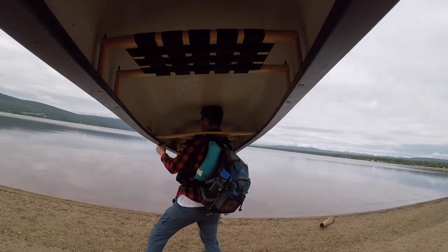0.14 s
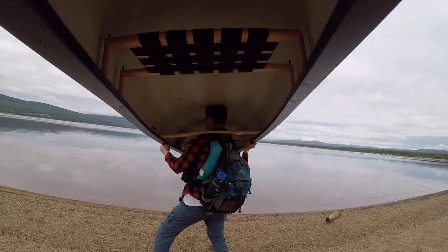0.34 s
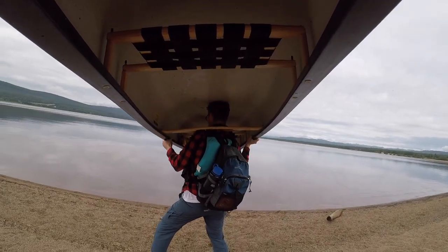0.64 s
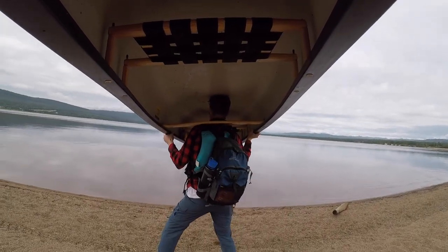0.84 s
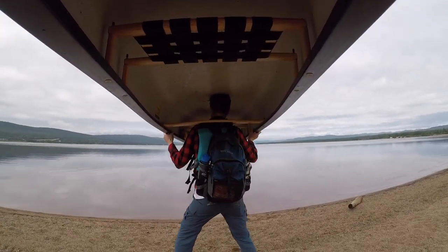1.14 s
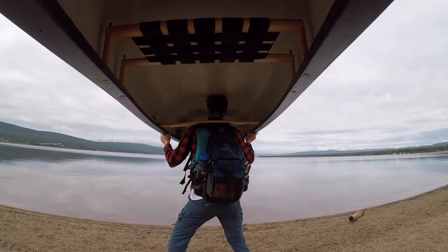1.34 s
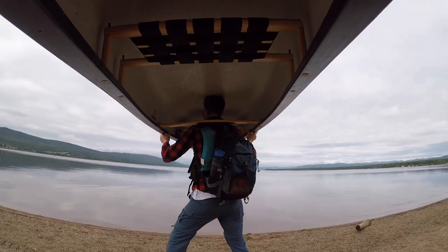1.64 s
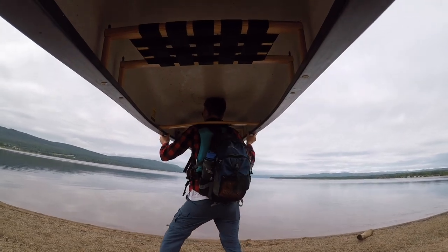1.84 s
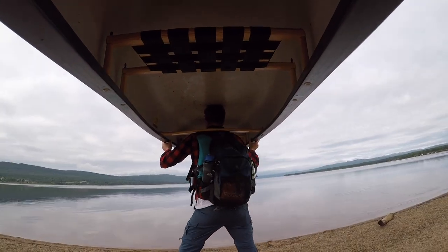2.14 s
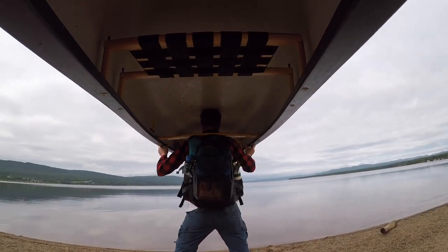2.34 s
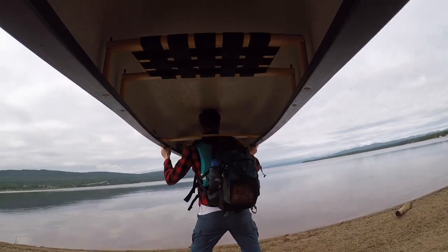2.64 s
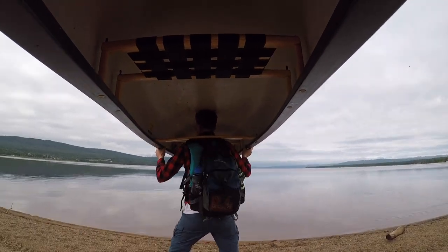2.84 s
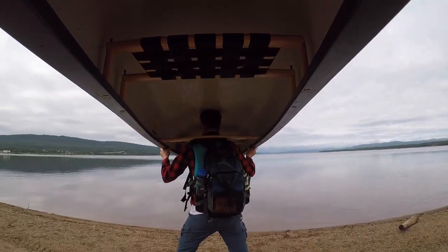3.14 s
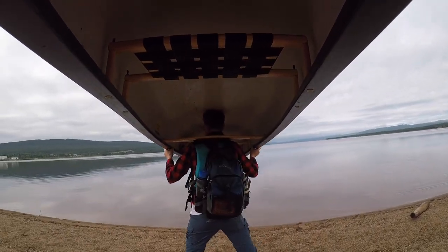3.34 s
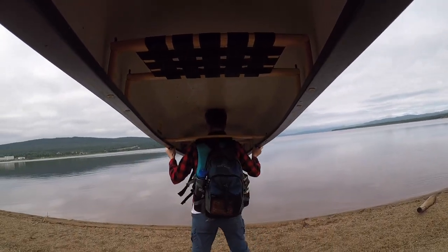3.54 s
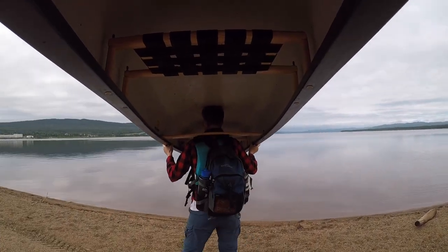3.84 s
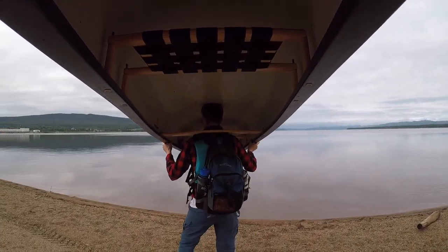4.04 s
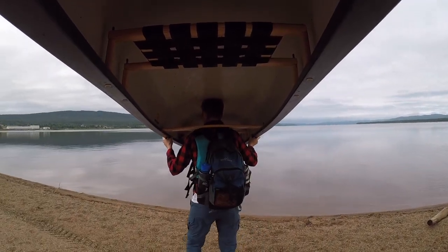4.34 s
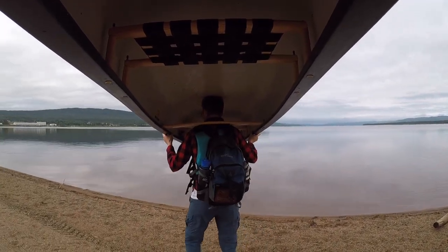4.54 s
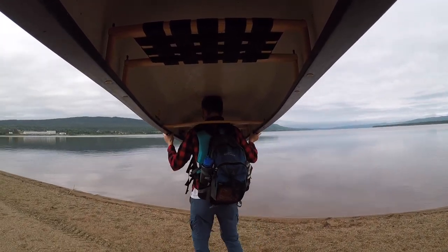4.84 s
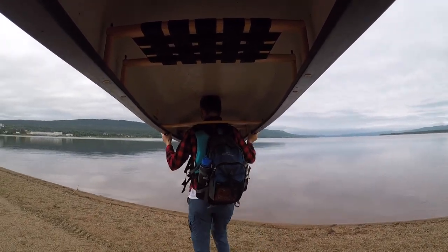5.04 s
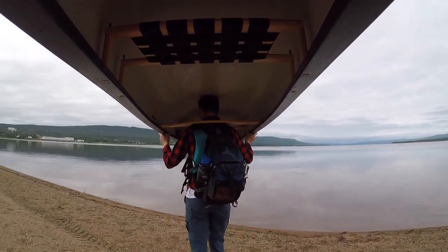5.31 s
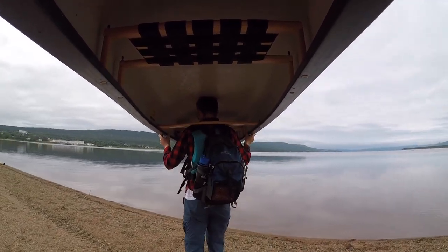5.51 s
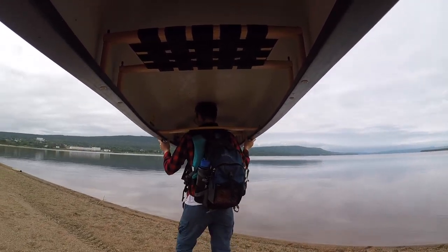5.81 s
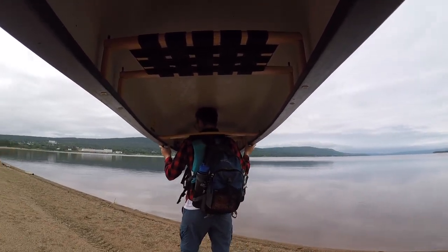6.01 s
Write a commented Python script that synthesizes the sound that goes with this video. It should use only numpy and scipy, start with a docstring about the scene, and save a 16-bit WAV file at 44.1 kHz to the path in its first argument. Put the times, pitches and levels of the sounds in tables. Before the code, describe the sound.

Close inside an overturned canoe carried along a sandy shore, a microphone fixed to the hull picks up loud, boomy bumps and grainy rubs as it settles on the shoulders. Deep flexing and rumble sway underneath. Small buckle-like clicks and faint pack rustle grow unevenly, then sand crunches and a loud nylon swish come past the middle. A hard knock follows, then lesser bumps to the end.

```python
"""Inside an upturned canoe settled on a walker's shoulders and carried along a sandy lake shore.
Close-set bumps and rubs come first: roughened decaying modes for bumps, stick-slip grains through them for rubs.
Low flexing tones and rumble sway beneath; short clicks, as of buckles, are bursts of filtered noise.
The pack's rustle, coloured random grains, builds unevenly from faint; a loud swish falls near 3.7 s.
Boots crunch sand grains from 3.6 s; a hard knock lands at 4.7 s and lesser ones follow to the end."""
import sys
import numpy as np
from scipy import signal
from scipy.fft import rfft, irfft
from scipy.io import wavfile
from scipy.ndimage import uniform_filter1d, minimum_filter1d

SR = 44100
rng = np.random.default_rng(int(sys.argv[2]) if len(sys.argv) > 2 else 0)


def unload_wav(signal):
    """Save mono or channel-first audio to the path in sys.argv[1] as 16-bit WAV at rate SR, clipped to [-1, 1]."""
    wavfile.write(
        sys.argv[1],
        SR,
        np.round(np.clip(np.atleast_2d(signal).T, -1, 1) * 32767).astype(np.int16),
    )


N = 272097

# Flex of the hull along its length. Each row: time in seconds, level in dB.
FLEX = [(0.0, -31.5), (0.05, -24), (0.26, -32), (0.34, -55), (0.5, -25), (1.37, -38), (1.42, -46),
        (1.6, -28.5), (2.29, -28), (2.7, -19), (3.35, -37.5), (3.61, -25.5), (4.07, -40.5), (4.4, -28),
        (4.48, -44), (4.62, -30), (6.0, -25), (6.17, -29.5)]
# Sideways lurches. Each row: start in seconds, length in seconds, rumble level in dB.
LURCHES = [(0, 0.16, -31), (2.732, 0.27, -25), (3.587, 0.6, -32.5), (5.75, .25, -30), (6.013, 0.11, -20)]
# Spectrum of the rocking rumble. Each row: frequency in Hz, relative level in dB.
ROCK_COLOUR = [(10, 36.5), (18, -3), (25, 34.5), (34, 48), (43, 26.5), (60, 35.5), (80, 37.5), (110, 3),
               (220, -39.5)]
# Steady rustle of the walker. Each row: time in seconds, nylon level in dB, sand and cloth level in dB.
PACE = [(0, -81.5, -69), (.6, -77.5, -68.5), (1.25, -71.5, -61), (2, -64, -56), (2.6, -69.5, -59),
        (3, -69.5, -60), (3.55, -59, -52.5), (4.45, -59, -51.5), (4.95, -65.5, -57.5), (5.4, -63, -55),
        (6.15, -59, -51.5)]
# Strokes of sleeve and trouser against the pack. Each row: peak in seconds, half length in seconds,
# nylon swish level in dB, scuff level in dB.
STROKES = [(0.038, 0.058, -69.5, -53), (.14, 0.038, -68.5, -61), (0.297, 0.071, -68.5, -55.5),
           (0.486, 0.061, -70.5, -61.5), (0.724, 0.1, -70.5, -62), (1.02, 0.17, -72, -58),
           (1.461, 0.075, -67.5, -53.5), (1.796, 0.031, -64, -49), (2.083, 0.064, -61, -49),
           (2.194, 0.085, -55.5, -48), (2.302, 0.035, -63, -47), (2.478, 0.18, -62, -49.5),
           (2.8, 0.083, -68.5, -53.5), (3.354, 0.042, -65.5, -57), (3.74, 0.083, -50, -48.5),
           (4.163, 0.12, -56, -49), (4.636, 0.09, -52.5, -44), (5.066, 0.052, -60.5, -75),
           (5.13, .015, -52.5, -55), (5.191, 0.047, -48, -58), (5.55, 0.064, -65, -55),
           (5.883, 0.15, -52, -55)]
# Spectrum of nylon swish. Each row: frequency in Hz, relative level in dB.
SWISH_COLOUR = [(1500, -24), (3000, -10), (3900, -5.5), (4700, -8), (5400, -6), (6400, 0), (7700, 0),
                (8400, -5.5), (10000, -9.5), (11300, -18), (13000, -28), (15000, -42)]
# Spectra of the dull and bright nylon parts. Each row: frequency in Hz, relative level in dB.
BRUSH_COLOUR = [(1500, -18), (2800, -3), (4000, 0), (4800, -5), (7000, -18)]
SIZZLE_COLOUR = [(8000, -14), (10000, 0), (12000, -3), (13500, -8), (15000, -28)]
# Spectrum of cloth and sand scuffing. Each row: frequency in Hz, relative level in dB.
SCUFF_COLOUR = [(300, 2.5), (700, 0), (1100, -2), (1550, -4.5), (1720, -8.5), (1900, -6), (2300, -10),
                (3800, -13), (4800, -22), (9000, -78.5), (14000, -81)]
# Boots digging into sand. Each row: start in seconds, level in dB, decay length in seconds.
STEPS = [(3.593, -30.5, 0.028), (3.612, -48, 0.049), (3.718, -55, .026), (4.116, -45.5, 0.05),
         (5.776, -39, 0.025), (5.8, -36, 0.047)]
# Spectrum of crunching sand. Each row: frequency in Hz, relative level in dB.
SAND_COLOUR = [(400, 0.5), (1000, -2.5), (1500, 1), (1850, -1), (2300, -6), (3000, -3.5), (3900, -9),
               (4500, -14.5), (7200, -4), (10000, -18.5), (11300, -32), (13300, -20), (15000, -29)]
# Short clicks: buckles, fittings, a sand crunch, the crack of a hard knock.
# Each row: time in seconds, level in dB, ring frequency in Hz.
CLICKS = [(.017, -65, 7600), (0.06, -53.5, 2800), (.062, -63, 7100), (.385, -68, 3500), (0.683, -59, 1380),
          (0.742, -55.5, 1790), (0.741, -57.5, 3760), (0.945, -58, 2480), (.948, -52.5, 4070),
          (1.244, -66, 7340), (1.498, -56.5, 1490), (1.627, -64.5, 3840), (1.674, -59.5, 3550),
          (2.0201, -47.5, 4440), (2.02, -54, 6640), (2.229, -56, 2100), (2.442, -49, 3310),
          (2.44, -45.5, 1570), (2.448, -50.5, 1980), (2.534, -54, 2560), (2.623, -55, 6440),
          (2.636, -56.5, 6450), (2.751, -61, 4200), (2.814, -59, 3170), (2.91, -55, 2470),
          (3.598, -39, 1880), (3.729, -46.5, 4200), (3.923, -58, 4230), (4.14, -45, 1880),
          (4.71, -36.5, 1610), (4.713, -45, 2470), (4.714, -51, 3820), (5.524, -54.5, 6500)]
# Likeness of left and right in airborne sound. Each row: frequency in Hz, correlation from -1 to 1.
LIKENESS = [(300, -.6), (700, -.5), (1400, -.2), (2300, .1), (3600, .55), (6500, .25), (9000, .05),
            (14000, 0)]
# Hull modes. Each row: frequency in Hz, 60 dB decay time in seconds, relative level in dB rocking
# the two ports against each other, relative level in dB moving them together.
HULL = [(57, 0.35, -6, -28), (81, 0.25, -2.5, -32), (97.1, 0.79, -17.5, -14), (120.07, 0.76, 0.5, -16.5),
        (126.7, 0.29, -3.5, -13), (150.4, 0.65, -19, -12.5), (165.3, 0.25, -14.5, -13),
        (196.4, 0.18, -20.5, -9), (236, 0.26, 1, -17), (258.9, 0.15, -5, -7.5), (305, 0.023, 17, -36),
        (319, 0.021, 2.5, -49), (374.6, 0.099, 3, -11.5), (428.6, 0.17, -4, -21), (448, 0.066, -12, -4),
        (493.6, 0.13, 3, -14), (558, 0.058, -26, -19.5), (615, 0.07, -0.5, -20.5), (674, 0.072, -0.5, -11),
        (791, 0.052, 10.5, -5), (920, 0.045, 11.5, -9.5), (1210, 0.044, -11, -10), (1550, 0.033, 0.5, -7.5),
        (1912, 0.025, -10, -9)]
# Longer slides of the yoke over the shoulders. Each row: start in seconds, length in seconds,
# panel chatter level in dB, shell drone level in dB.
SLIDES = [(0, 0.035, -43, -2), (0.272, 0.078, -40, -17), (0.715, 0.24, -37, -27.5),
          (2.063, 0.25, -28.5, -18.5), (2.405, .05, -28, -17), (2.75, 0.24, -62, -24),
          (3.738, 0.087, -38, -16.5), (4.42, 0.13, -35.5, -24), (4.562, 0.11, -55, -19.5),
          (5.442, 0.18, -42, -14.5), (6.032, 0.093, -40, -21.5)]
# Bumps on the hull. Each row: time in seconds, shell boom level in dB, panel knock level in dB,
# contact hardness in dB per octave, stiff rim clack level in dB.
KNOCKS = [(0.004, -10, -16, -9, -32), (0.025, -12.5, -14.5, -2, -50), (0.055, -17.5, -20.5, 1.5, -35.5),
          (0.249, -15, -14.5, -4.5, -30.5), (0.337, -44, -21.5, -10.5, -63), (0.37, -14, -25, -7, -50),
          (0.686, -22, -31.5, -2.5, -45.5), (0.789, -24.5, -39, 23, -81), (1.003, -24, -30.5, -4.5, -63),
          (1.114, -21.5, -29, -1.5, -46), (1.261, -15, -30.5, -16, -55), (1.384, -14.5, -23, -13.5, -54),
          (1.417, -37, -24.5, -4.5, -63), (1.49, -22.5, -32.5, 9, -56), (1.617, -37, -28.5, -13, -54),
          (1.673, -14, -18, 1.5, -32.5), (2.025, -18, -36, -9, -60), (2.08, -28, -25, -7.5, -64),
          (2.143, -20, -22, -3.5, -54), (2.201, -14, -26.5, -3, -55), (2.245, -15, -25.5, -2, -67),
          (2.335, -12.5, -18.5, -9.5, -67), (2.425, -11.5, -23, -7, -46), (2.447, -14.5, -14, -11, -39),
          (2.591, -21, -13, -6, -39.5), (2.816, -52, -31, 8, -50), (3.727, -17, -31.5, 5, -63),
          (3.779, -31, -23.5, -4, -39), (4.18, -24.5, -53, 2, -66), (4.414, -14, -22.5, -5.5, -60),
          (4.484, -21, -24.5, -10.5, -62), (4.71, -11, -12.5, -2, -25), (5.096, -16, -15, 2.5, -45),
          (5.418, -13.5, -29, -2, -48), (5.47, -21, -48, -2, -66), (5.542, -21, -24, -19, -58),
          (5.589, -52, -36, -19, -62), (6.067, -30.5, -32.5, -19, -41), (6.114, -25, -21, -9.5, -46)]

# Mode range of each hull part: above the first Hz, up to the second.
SHELL, PANELS, RIM = (0, 190), (190, 575), (575, 3000)

LURCH_ATTACK_S, LURCH_RELEASE_S, ROCK_REST_DB = 0.056, 0.074, -38.5
STROKE_SHAPE = 1.93  # 1 = pointed swell, 2 = rounded
WALKING_SWISH_DB = -60
BRUSH_DB, SIZZLE_DB = -73.5, -73  # at walking swish level
BRUSH_GROWTH, SIZZLE_GROWTH = 0.5, 0.9  # dB per dB of swish
SLIDE_ATTACK_S, SLIDE_RELEASE_S = 0.0075, 0.043
CREEP_CHATTER_DB, CREEP_DRONE_DB = -42.5, -29.5  # the yoke never sits quite still
# Rubbing after a bump: levels relative to the bump, decay time constant.
SETTLE_CHATTER_DB, SETTLE_DRONE_DB, SETTLE_S = -23, -2.5, 0.12
TOP_HZ = 15000

TIME = np.arange(N) / SR
BINS = np.fft.rfftfreq(N, 1 / SR) + 1e-3  # Hz, kept off zero for the logs


def undb(db):
    """Decibels to gain."""
    return 10 ** (np.asarray(db) / 20)


def unit(x):
    """Scale to rms 1."""
    return x / np.sqrt(np.mean(x ** 2))


def curves(table):
    """Each column of a timed table, sample by sample."""
    s, *columns = np.transpose(table)
    return [np.interp(TIME, s, column) for column in columns]


def over_bins(points):
    """Join (Hz, value) points on a log-frequency axis."""
    hz, value = np.transpose(points)
    return np.interp(np.log(BINS), np.log(hz), value)


def colour(x, points):
    """Shape the spectrum of x, then scale to rms 1."""
    return unit(irfft(rfft(x) * undb(over_bins(points)), N))


def add(track, s, sound):
    """Mix a sound into a track at time s."""
    i = max(int(s * SR), 0)
    track[..., i:i + sound.shape[-1]] += sound[..., :N - i]


def grains(rate_hz, spread_db, channels=2):
    """Random tiny slips, a few much larger than the rest."""
    size = undb(spread_db * np.minimum(rng.exponential(size=(channels, N)), 4))
    slips = rng.random((channels, N)) < rate_hz / SR
    return slips * size * rng.standard_normal((channels, N))


def walk(rate_hz):
    """Smooth random wander, spread near 1."""
    return np.interp(TIME * rate_hz, np.arange(2000), rng.standard_normal(2000)) * 1.2


def shimmer(x, depth_db, rate_hz):
    """Let each half-octave band of x waver alone, as the rubbing spot moves."""
    spectrum, out = rfft(x), 0
    place = np.clip(2 * np.log2(BINS / 800), 0, 5)
    for k in range(6):
        band = irfft(spectrum * np.maximum(1 - np.abs(place - k), 0), N)
        out = out + band * undb(depth_db * walk(rate_hz))
    return unit(out)


def gesture(start_s, length_s, attack_s, release_s):
    """Linear attack, hold and exponential release of one movement."""
    age_s = np.maximum(TIME - start_s, 0)
    return np.minimum(age_s / attack_s, 1) * np.exp(-np.maximum(age_s - length_s, 0) / release_s)


def together_db(rest_db, movements):
    """Level of (dB, envelope) movements on top of a resting level; their powers add."""
    power = sum((undb(db) * shape) ** 2 for db, shape in movements)
    return 10 * np.log10(undb(rest_db) ** 2 + power)


def airborne(pair):
    """Weight two unrelated sounds as the mid and side of sound arriving through the air."""
    correlation = np.clip(over_bins(LIKENESS), -.9, .9)
    side_gain = np.sqrt((1 - correlation) / (1 + correlation))
    return np.array([pair[0], irfft(rfft(pair[1]) * side_gain, N)])


def left_right(pair):
    """Mid and side to left and right."""
    mid, side = pair
    return np.array([mid + side, mid - side])


def swaying(first_hz=17.7, second_hz=34.5, wander=0.0832, second_db=-12):
    """The long hull flexes in two deep bending modes and rocks sideways in a rumble at each lurch."""
    def mode(hz):
        wandering_hz = hz * (1 + wander * walk(21.0))
        return np.sqrt(2) * np.exp(2j * np.pi * np.cumsum(wandering_hz) / SR)

    flex_db, = curves(FLEX)
    lurches = [(db, gesture(s, length_s, LURCH_ATTACK_S, LURCH_RELEASE_S)) for s, length_s, db in LURCHES]
    rock_gain = undb(together_db(ROCK_REST_DB, lurches))
    first = mode(first_hz) * undb(flex_db + 0.75 * walk(5.4))
    second = mode(second_hz) * undb(flex_db + second_db + 2.5 * walk(11))
    heave, rock = (colour(rng.standard_normal(N), ROCK_COLOUR) * rock_gain for _ in range(2))
    flex = first + second
    mid = flex.real + undb(-5) * heave
    # the ports move out of step, the right one further
    side = (flex * np.exp(2.2j)).real + rock
    return np.array([mid, side])


def rustling():
    """Nylon slides in fine grains and scuffs join; its dull and bright parts grow more slowly than its body as
    it swells."""
    nylon_rest_db, scuff_rest_db = curves(PACE)
    swells = [np.exp(-np.abs((TIME - s) / half_s) ** STROKE_SHAPE) for s, half_s, _, _ in STROKES]
    strokes = np.array(STROKES)
    swish_db = together_db(nylon_rest_db, zip(strokes[:, 2], swells))
    scuff_db = together_db(scuff_rest_db, zip(strokes[:, 3], swells))
    above_walking_db = swish_db - WALKING_SWISH_DB
    swish = colour(grains(14000, 2.2), SWISH_COLOUR)
    brush = colour(grains(9000, 2.2), BRUSH_COLOUR)
    sizzle = colour(grains(6000, 2.6), SIZZLE_COLOUR)
    scuff = shimmer(colour(grains(6000, 2.4), SCUFF_COLOUR), depth_db=2.2, rate_hz=28)
    nylon = swish * undb(swish_db)
    nylon = nylon + brush * undb(BRUSH_DB + BRUSH_GROWTH * above_walking_db)
    nylon = nylon + sizzle * undb(SIZZLE_DB + SIZZLE_GROWTH * above_walking_db)
    # the fabric catches and lets go, so its level flutters
    flutter = undb(0.69 * walk(65))
    return airborne(nylon * flutter + scuff * undb(scuff_db))


def footsteps():
    """Sand grains crunch past each other as a boot sinks in."""
    weight = np.zeros(N)
    for s, db, length_s in STEPS:
        age = np.maximum(TIME - s, 0) / length_s
        weight += undb(db) * (1 - np.exp(-age * 4)) * np.exp(-age ** 2)
    crunch = shimmer(colour(grains(4000, 2.4), SAND_COLOUR), depth_db=1.4, rate_hz=120)
    return airborne(crunch) * weight


def clicks(t60_s=0.06, rise_s=0.0006, crack_gain=1.6):
    """Short clicks: a quick octave-wide crack of noise excites one brief narrow ring."""
    out = np.zeros((2, N))
    t = np.arange(SR // 10) / SR
    fade = np.exp(-np.log(1000) * t / t60_s)
    rise = 1 - np.exp(-t / rise_s)
    for s, db, hz in CLICKS:
        octave = [hz / np.sqrt(2), hz * np.sqrt(2)]
        crack_band = signal.butter(2, octave, "band", fs=SR, output="sos")
        snap = unit(signal.sosfilt(crack_band, rng.standard_normal((2, len(t)))))
        ring = unit(signal.lfilter(*signal.iirpeak(hz, 14, fs=SR), snap))
        # the crack fades twice as fast as the ring
        add(out, s, undb(db) * (ring + crack_gain * snap * fade) * rise * fade)
    return airborne(out)


def hull_ring(part, hardness_db=0, scatter_db=0, detune=0, rough=0, push_s=0.0029):
    """Mid and side of one hull part's decaying modes after one push, side at rms 1 over its first moments."""
    t = np.arange(int(.6 * SR)) / SR
    out = np.zeros((2, len(t)))
    for k, (hz, t60_s, side_db, mid_db) in enumerate(HULL):
        if not part[0] < hz <= part[1]:
            continue
        # the place of contact changes each mode's share, the load its pitch
        share, bend = rng.standard_normal(2)
        gain = undb(scatter_db * share + hardness_db * np.log2(hz / 350))
        n = min(int(t60_s * SR), len(t))
        # crowded neighbours make each ring beat unevenly
        knots = rng.standard_normal(100) + 1j * rng.standard_normal(100)
        beat = np.interp(t[:n] * hz / 4, np.arange(100), knots)
        decay_per_s = np.log(1000) / t60_s
        ring = np.exp((2j * np.pi * hz * (1 + detune * bend) - decay_per_s) * t[:n])
        ring = ring * (1 + rough * beat)
        # bending waves disperse, so panel and rim modes do not start in step
        ring *= gain * np.exp(-1j * k * (0 if part == SHELL else 1.2))
        out[:, :n] += np.array([undb(mid_db) * ring.real, undb(side_db) * ring.imag])
    out *= 1 - np.exp(-(t / push_s) ** 2)
    first_moments = SR // (20 if part == SHELL else 40)
    return out / np.sqrt(np.mean(out[1, :first_moments] ** 2))


def rubbing(rim_db=-16):
    """The yoke sticks and slips as it creeps, slides and settles after bumps; the hull answers each slip."""
    chatter, drone = [], []
    for s, length_s, chatter_db, drone_db in SLIDES:
        slide = gesture(s, length_s, SLIDE_ATTACK_S, SLIDE_RELEASE_S)
        chatter.append((chatter_db, slide))
        drone.append((drone_db, slide))
    for s, boom_db, knock_db, _, _ in KNOCKS:
        settle = gesture(s, 0, SLIDE_ATTACK_S, SETTLE_S)
        chatter.append((knock_db + SETTLE_CHATTER_DB, settle))
        drone.append((boom_db + SETTLE_DRONE_DB, settle))
    chatter_db = together_db(CREEP_CHATTER_DB, chatter)
    drone_db = together_db(CREEP_DRONE_DB, drone)
    out = 0
    for part, db in ((PANELS, chatter_db), (SHELL, drone_db), (RIM, chatter_db + rim_db)):
        slips = grains(500, 2.7, channels=1) * undb(1.33 * walk(27))
        response = hull_ring(part, hardness_db=-1, detune=0.0095, rough=1.0)
        ring = signal.fftconvolve(slips, response)[:, :N]
        out = out + ring / ring[1].std() * undb(db)
    return out


def bumps(slide_db=-11):
    """Each bump clacks on the rim, knocks the panels, slides on for a moment and sets the whole shell booming."""
    out = np.zeros((2, N))
    for s, boom_db, knock_db, hardness_db, clack_db in KNOCKS:
        boom = hull_ring(SHELL, scatter_db=1.52, detune=0.0027, rough=0.066, push_s=0.01)
        add(out, s, undb(boom_db) * boom)
        knock = hull_ring(PANELS, hardness_db, scatter_db=1.2, detune=.015, rough=.35, push_s=.0045)
        add(out, s, undb(knock_db) * knock)
        slide_s = s + rng.uniform(0.01183, 0.0303)
        slide = hull_ring(PANELS, hardness_db - 6.5, scatter_db=3.4, detune=0.02, rough=1.0, push_s=0.0068)
        add(out, slide_s, undb(knock_db + slide_db) * slide)
        clack = hull_ring(RIM, 2 * hardness_db - 8, scatter_db=1.5, detune=0.02, rough=0.9, push_s=0.0023)
        add(out, s, undb(clack_db) * clack)
    return out


def scene():
    """Bumps and rubs shake the microphone directly, the left port a little more; the rest is mixed evenly."""
    lean_db = 0.72
    rest = left_right(swaying() + rustling() + footsteps() + clicks())
    hull = left_right(rubbing() + bumps()) * undb([[lean_db], [-lean_db]])
    return rest + hull


def record(dry):
    """A limiter ducks both channels around peaks above 0.92; a steep low-pass cuts the top."""
    hold = SR // 80  # samples
    allowed = np.minimum(1, .92 / (np.abs(dry).max(axis=0) + 1e-9))
    gain = uniform_filter1d(minimum_filter1d(allowed, hold), hold)
    low_pass = signal.ellip(10, .2, 80, TOP_HZ, fs=SR, output="sos")
    return signal.sosfilt(low_pass, dry * gain)


dry = scene()
out = record(dry)
unload_wav(out)
```